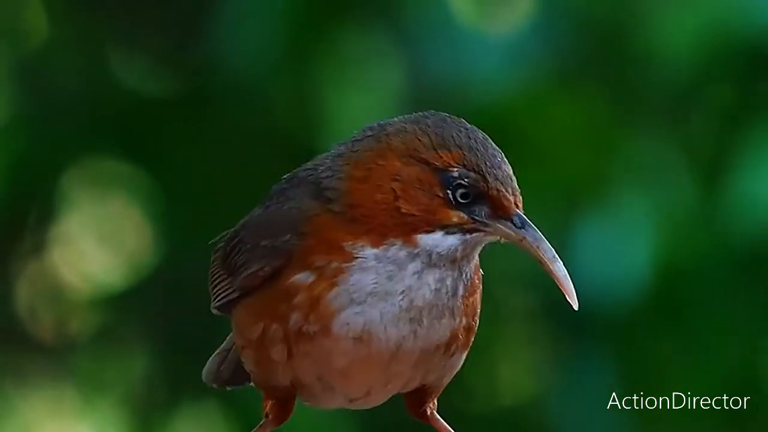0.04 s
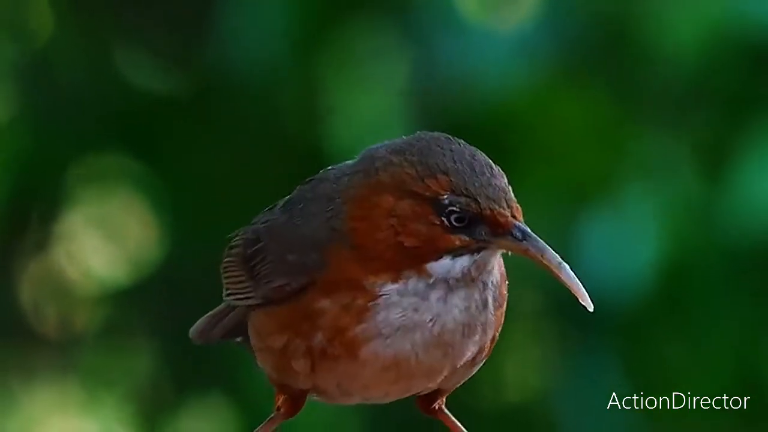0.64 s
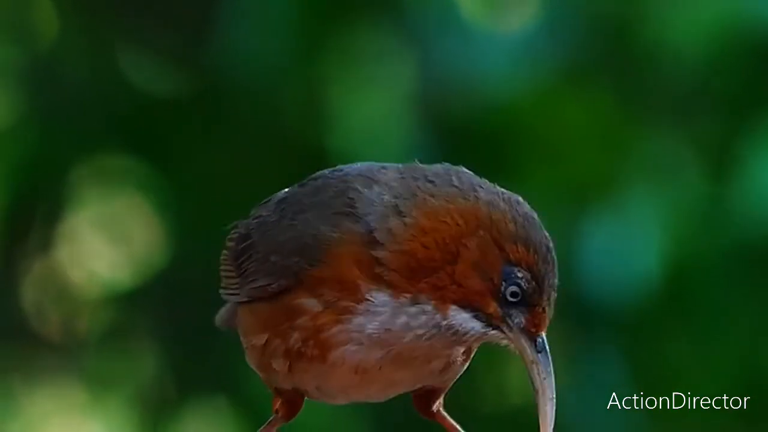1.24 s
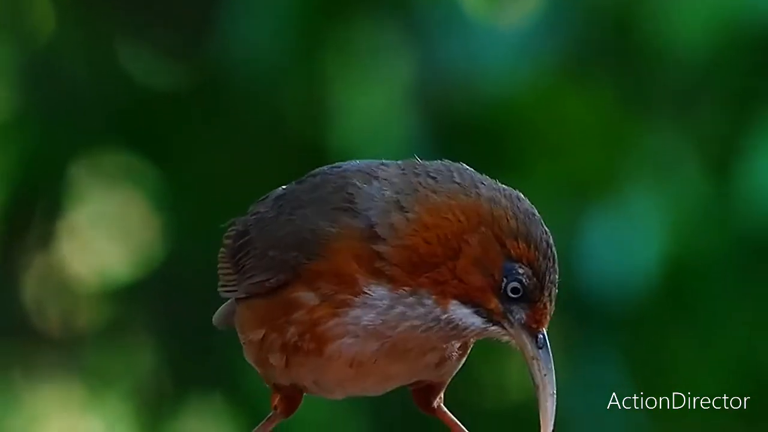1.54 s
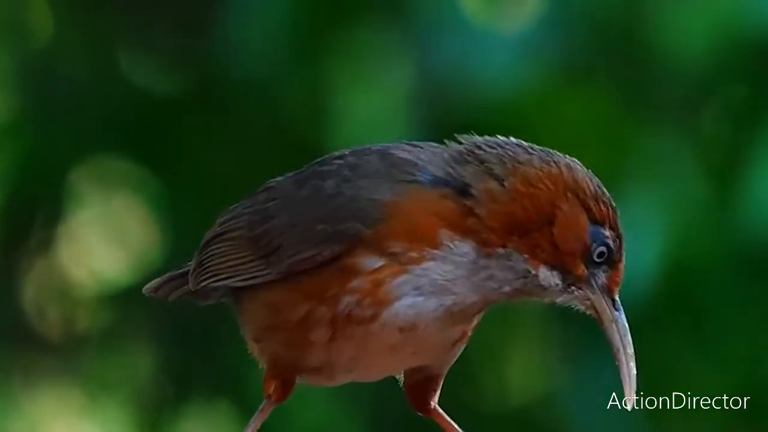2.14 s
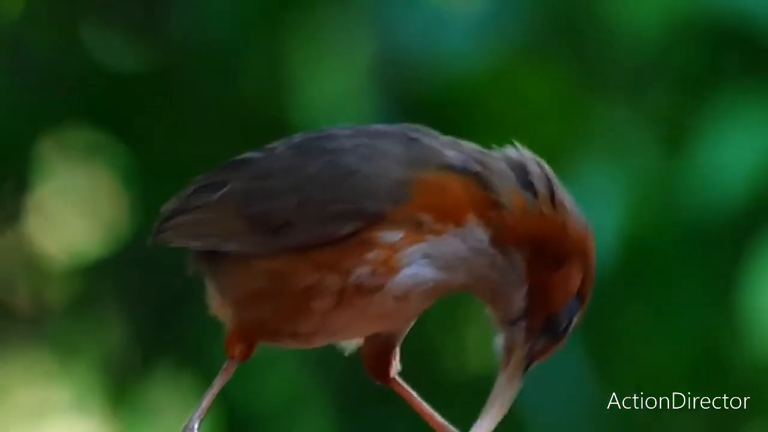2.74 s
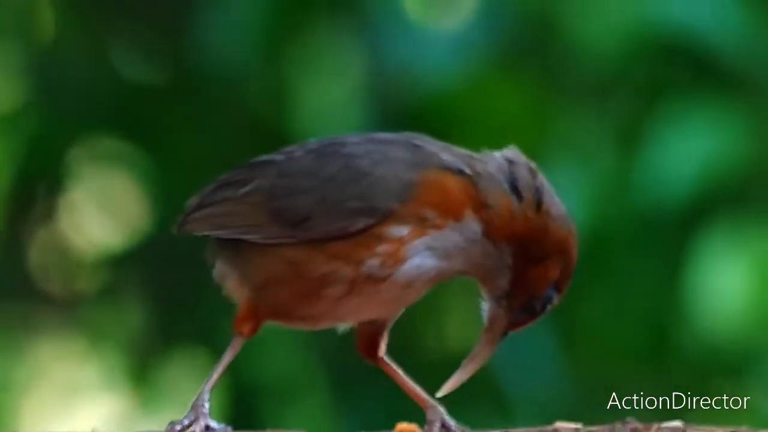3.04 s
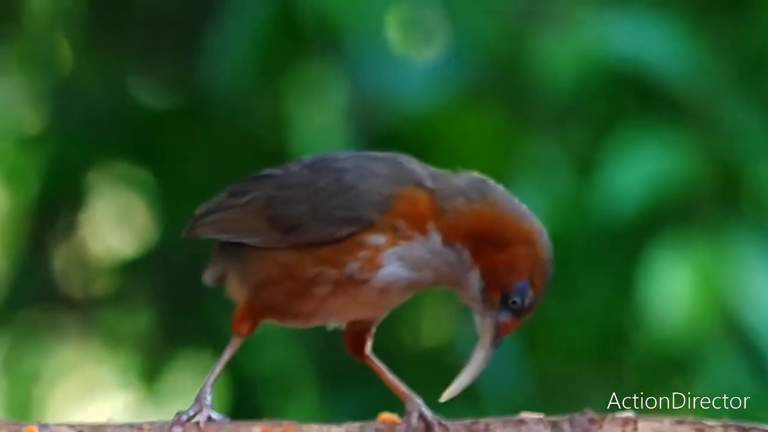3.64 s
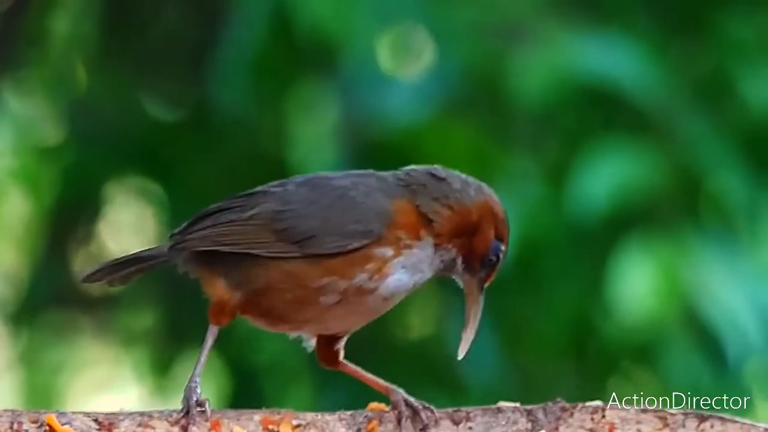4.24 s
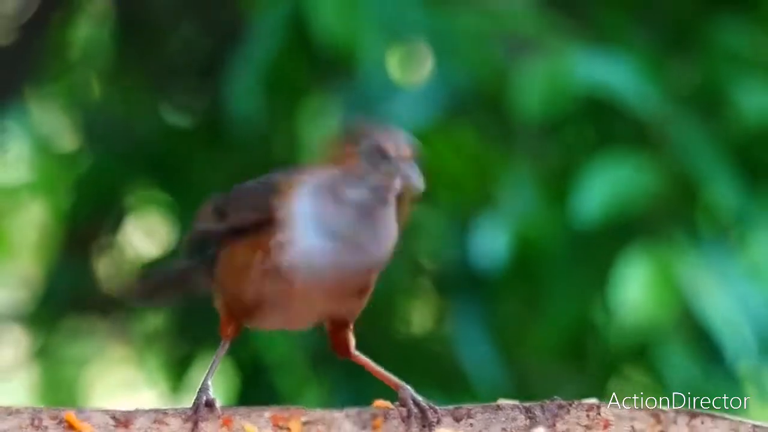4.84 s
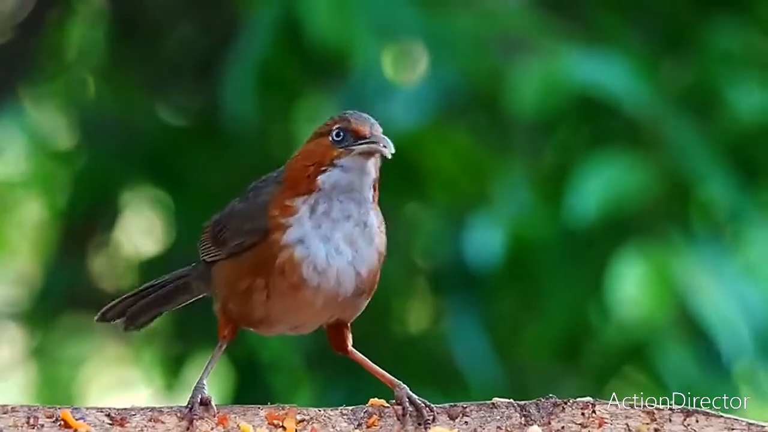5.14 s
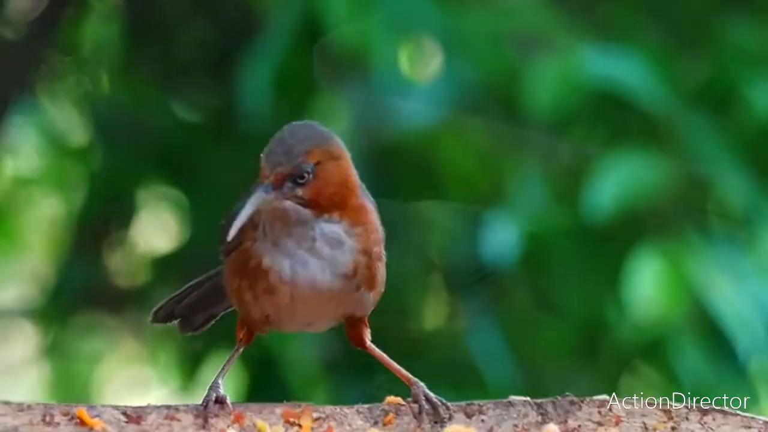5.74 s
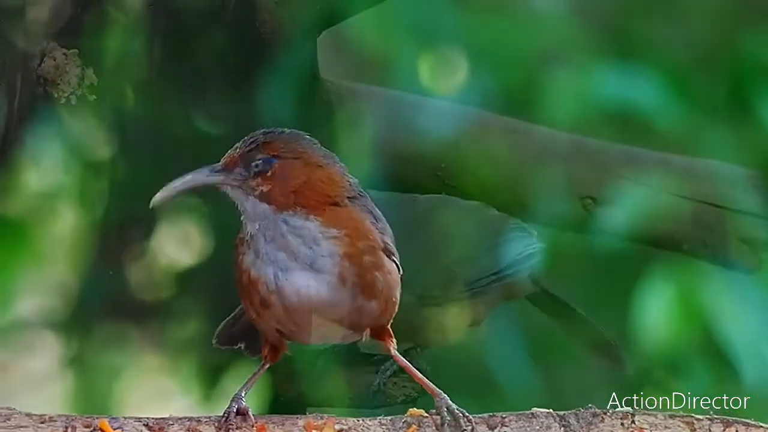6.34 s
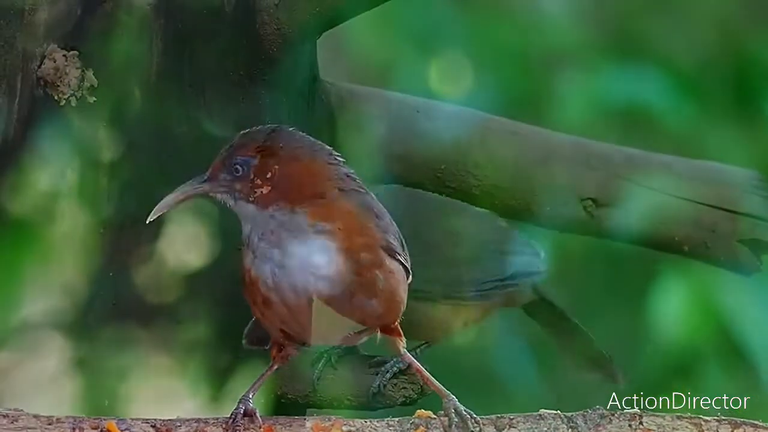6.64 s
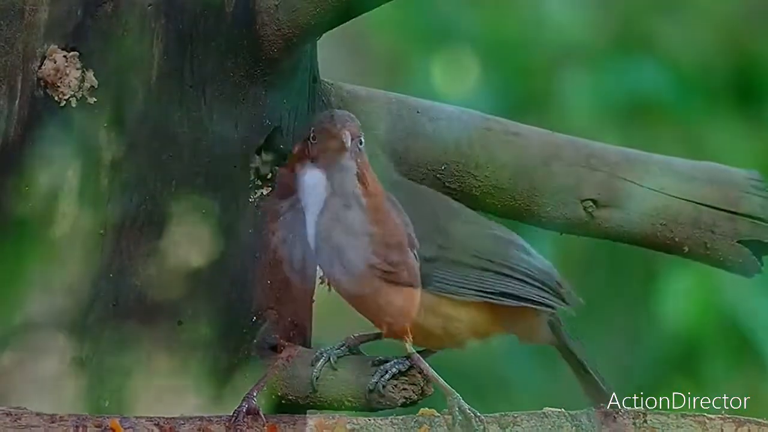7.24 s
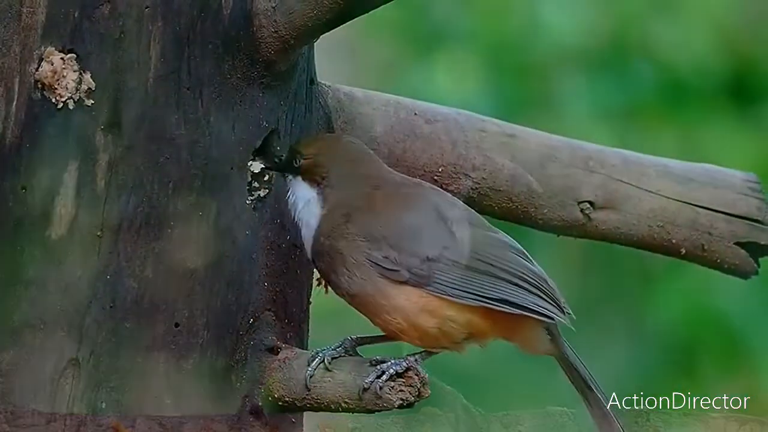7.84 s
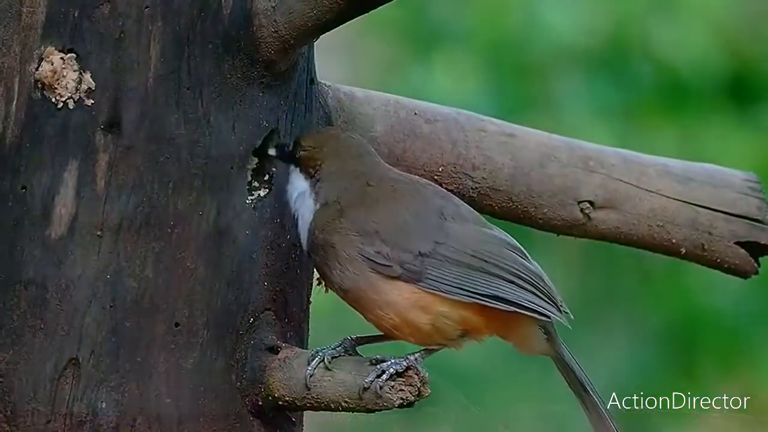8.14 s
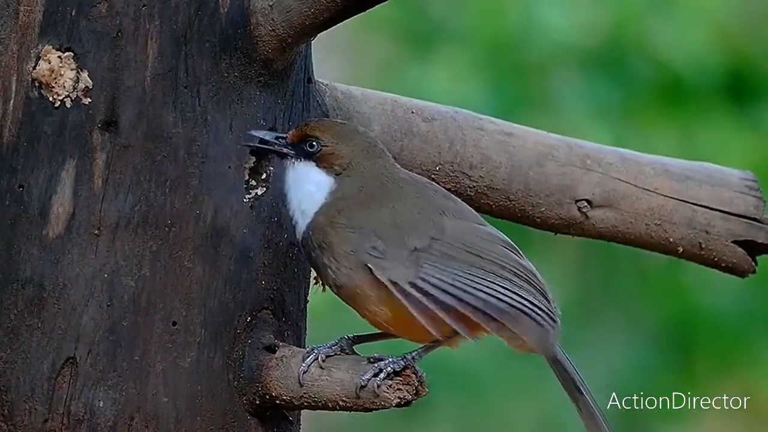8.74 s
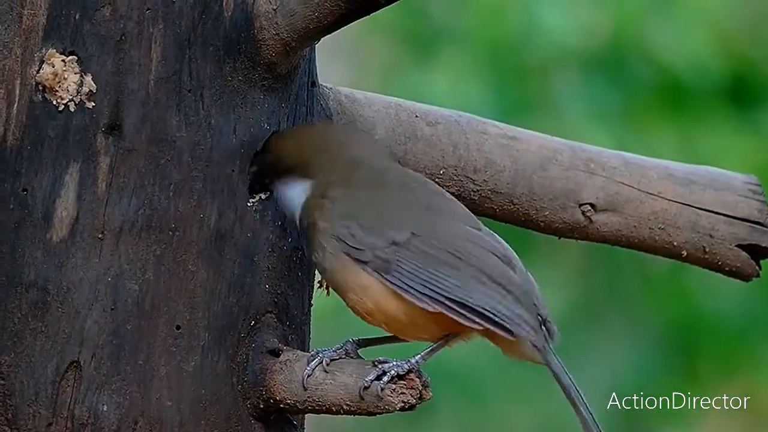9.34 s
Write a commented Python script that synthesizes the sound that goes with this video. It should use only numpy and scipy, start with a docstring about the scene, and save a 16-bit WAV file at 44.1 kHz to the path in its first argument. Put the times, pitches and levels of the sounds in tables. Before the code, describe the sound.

A faint, steady hiss runs throughout in a forest. In the first 1.3 seconds a distant bird gives four rising, whip-like calls, and a nearer songbird sings one short note at about 0.7 seconds. From 2.3 to 3.2 seconds that nearer bird sings a trill of nasal, falling notes, about twelve a second. At 5.3 seconds a second, clearly louder bird begins a slightly hoarse trill that sinks in pitch until 6.4 seconds. The first bird joins just after 6 seconds and continues to about 7. A softer, dry bird rasp comes at 7.6 seconds, with four thin whistles stepping upward until 8.7. The first bird then gives a last short trill, ending around 9.2 seconds. Very faint, faraway hoots, coos, chips and twitters come and go, and the trees give each call a short echo.

```python
"""A forest, over a faint, steady hiss. A far bird hoots and another gives four rising whips; distant chips,
twitters and coos come and go. A babbler sings one note, then a trill: about twelve nasal, falling notes
a second, made by vibrating membranes in its throat. After five seconds its louder partner, the lead,
trills too, and the first bird, its mate, joins in before it ends. A dry rasp and thin whistles follow,
then the mate's last trill. The trees give every call a short echo."""
import sys
import numpy as np
from scipy import signal
from scipy.fft import rfft, irfft, next_fast_len
from scipy.io import wavfile

SR = 44100
rng = np.random.default_rng(int(sys.argv[2]) if len(sys.argv) > 2 else 0)


def generate_wav(signal):
    """Clip the signal to [-1, 1] and save it as 16-bit WAV at the path in sys.argv[1]."""
    frames = np.transpose(np.atleast_2d(signal))
    scaled = np.clip(frames, -1, 1) * 32767
    pcm = np.round(scaled).astype(np.int16)
    wavfile.write(sys.argv[1], SR, pcm)


N = 418068

# Levels in the tables are relative: echo and mixing set the final loudness. tone colour of the steady
# background hiss: f/Hz, level/dB
HISS_COLOUR = [(15, -43), (25, -10.5), (50, 0), (190, -1), (330, -2), (700, -4.5), (1270, -8.5), (2100, -8),
               (3200, -7.5), (5100, -12), (9800, -21), (11800, -24), (12800, -34), (15400, -33)]
# tone colour of the echo among the trees: f/Hz, level/dB
ECHO_COLOUR = [(500, 6), (2700, 3), (5500, 4), (8200, 4.5), (14000, -19)]
# low, very distant hoots: t/s, length/s, first f/Hz, level/dB
HOOTS = [(0, 0.24, 690, -76), (3.266, .37, 750, -70), (4.297, .48, 690, -73.5), (5.181, .43, 700, -71),
         (6.946, 0.52, 700, -78.5)]
# lower, rising coos: t/s, length/s, level/dB
COOS = [(2.773, 0.15, -70), (3.188, 0.053, -65.5), (5.069, .12, -70), (8.203, 0.46, -75)]
# bursts of twittering deep in the leaves: t/s, length/s, centre f/Hz, level/dB
TWITTERS = [(0.186, 0.19, 3020, -72.5), (0.914, 0.08, 4550, -69), (1.664, 0.19, 3740, -75),
            (2.012, 0.31, 7270, -84.5), (2.927, 0.13, 3590, -69.5), (7.184, 0.11, 3220, -67),
            (8.12, 0.16, 4250, -71.5), (8.29, 0.089, 6950, -77.5)]
# rising whips of a bird deep in the trees: t/s at the top, top f/Hz, level/dB
WHIPS = [(0.109, 4530, -49), (0.484, 4360, -50), (.865, 4340, -50), (1.216, 4380, -48)]
# a far bird's repeated falling chip: t/s, level/dB
CHIPS = [(0.713, -65), (1.414, -65), (2.095, -62.5), (3.41, -66.5), (3.59, -67), (4.0, -66.5),
         (4.199, -68.5), (5.02, -67.5), (7.27, -65), (8.99, -63.5), (9.394, -66.5)]
# single far calls that slide up or down: t/s, length/s, first f/Hz, last f/Hz, level/dB
SLIDES = [(7.137, 0.084, 5600, 3020, -63.5), (7.334, 0.046, 2670, 2970, -62),
          (7.479, 0.034, 2730, 2500, -60), (7.542, 0.039, 2700, 3010, -61), (8.871, 0.015, 1770, 2570, -61),
          (9.286, 0.16, 1784, 2250, -67)]
# thin whistles, each a step higher: t/s, length/s, middle f/Hz, level/dB
THIN_WHISTLES = [(7.726, 0.133, 3157, -58), (8.108, 0.18, 3303, -55.5), (8.292, 0.189, 3350, -59),
                 (8.559, 0.19, 3497, -51.5)]
# pitches at which the rasping bird's throat rings: f/Hz, width/Hz, level/dB
RASP_THROAT = [(1290, 97, 0.5), (1900, 81, -3.5), (2250, 330, -4.5), (3220, 250, -3.5), (4300, 420, -5),
               (5400, 900, -13), (6900, 850, -15)]

# the lead babbler's trill: t/s, length/s, top f/Hz, level/dB
LEAD_NOTES = [(5.303, 0.058, 3015, -34), (5.391, 0.051, 3086, -31), (5.473, .058, 3035, -31),
              (5.557, 0.059, 3016, -30.5), (5.639, 0.056, 2958, -29), (5.716, 0.051, 2907, -28.5),
              (5.795, 0.048, 2860, -28), (5.873, 0.047, 2830, -28), (5.95, .043, 2798, -27.5),
              (6.024, .044, 2745, -28), (6.102, .04, 2728, -27), (6.175, .041, 2686, -26.5),
              (6.249, .04, 2636, -28), (6.32, 0.042, 2568, -30.5), (6.396, .045, 2510, -35)]
# its mate's notes, one alone and then three trills: t/s, length/s, top f/Hz, level/dB
MATE_NOTES = [(.674, 0.04, 2480, -46), (2.327, 0.064, 2763, -44), (2.418, 0.053, 2800, -41.5),
              (2.502, 0.048, 2805, -40.5), (2.579, 0.05, 2770, -40.5), (2.659, .052, 2755, -40.5),
              (2.735, 0.051, 2735, -40.5), (2.815, .047, 2702, -42), (2.899, 0.038, 2660, -36.5),
              (2.98, 0.036, 2604, -39), (3.068, 0.039, 2560, -41), (3.185, 0.039, 2516, -43),
              (6.144, .045, 2830, -42), (6.234, 0.04, 2857, -37.5), (6.315, 0.044, 2840, -37.5),
              (6.393, 0.051, 2820, -38), (6.473, .046, 2803, -38.5), (6.55, 0.046, 2772, -37),
              (6.628, 0.05, 2762, -38), (6.701, 0.054, 2746, -39), (6.781, .054, 2740, -39.5),
              (6.863, 0.051, 2685, -39), (6.951, 0.045, 2627, -38.5), (7.049, 0.041, 2554, -39.5),
              (8.737, 0.063, 2672, -41), (8.845, 0.057, 2704, -42), (8.937, 0.046, 2715, -41),
              (9.019, 0.04, 2672, -38), (9.104, 0.037, 2575, -40), (9.203, 0.039, 2514, -44.5)]
# harmonics 2 to 6 (multiples of the base pitch): full-voice level/dB, relaxed-voice level/dB
LEAD_OVERTONES = [(-14.5, -23.5), (-16, -31), (-35.5, -41), (-47, -59), (-50, -63)]
MATE_OVERTONES = [(-2, -14.5), (-10.5, -26.5), (-26, -57), (-53, -37), (-56, -39)]
# how the base tone (row 1) and overtones (row 2) swell: start level/dB, peak/share of note, end level/dB
LEAD_SWELL = [(-10.5, 0.54, -12.5), (-17, 0.41, -21.5)]
MATE_SWELL = [(-5, 0.8, -3), (-15.5, 0.38, -19.5)]
# higher notes sag further: top f/Hz, sag/share of pitch
LEAD_SAG = [(2560, 0.038), (2880, 0.121)]
MATE_SAG = [(2660, .035), (2850, 0.0835)]
# when the voices turn hoarse: start t/s, end t/s, cycles per flutter, flutter depth/0-1, grit/0-1
HOARSE_SPELLS = [(2.348, 2.393, 3, 0.26, 0), (2.44, 2.474, 3, 0.28, 0.03), (2.59, 2.95, 2, 0.05, 0),
                 (5.39, 5.93, 2, 0.06, 0.08), (5.93, 6.37, 2, 0.08, 0.07), (6.57, 6.92, 2, 0.09, 0.09)]
# the top two harmonics beam forward, so they come and go as the heads turn: t/s, level/dB
HEAD_TURNS = [(.7, 9), (3, -7), (5.7, 3), (7, -7), (9, 11)]


def from_db(db):
    """Turn decibels into a number to multiply a sound by."""
    return 10 ** (np.asarray(db) / 20)


def add(track, s, sound):
    """Mix a sound into the track, starting at s seconds."""
    at = max(round(s * SR), 0)
    track[at:at + len(sound)] += sound[:max(N - at, 0)]


def waver(size, per_s):
    """A random wobble that heads for a new value per_s times a second."""
    steps = np.arange(size) * per_s / SR
    return np.interp(steps, np.arange(400), rng.standard_normal(400))


def fade(t, edge_s):
    """Soften both ends of a sound."""
    from_edge_s = np.minimum(t - t[0], t[-1] - t)
    return np.sin(np.pi / 2 * np.clip(from_edge_s / edge_s, 0, 1)) ** 2


def coloured(x, spectrum):
    """Turn each frequency up or down along a curve of (Hz, dB) points."""
    hz, db = np.transpose(spectrum)
    size = next_fast_len(len(x))
    bin_hz = np.maximum(np.arange(size // 2 + 1) * SR / size, 1)
    gain = from_db(np.interp(np.log(bin_hz), np.log(hz), db))
    return irfft(rfft(x, size) * gain, size)[:len(x)]


def tone(hz, db):
    """A pure tone that follows a changing pitch."""
    return np.sqrt(2) * from_db(db) * np.sin(2 * np.pi * np.cumsum(hz) / SR)


def whistles(calls, edge_s, jitter):
    """Slightly wobbly tones that each bend through three pitches."""
    out = np.zeros(N)
    for s, length, first_hz, middle_hz, last_hz, db in calls:
        t = np.arange(int(length * SR)) / SR
        bend = np.polyfit([0, .5, 1], [first_hz, middle_hz, last_hz], 2)
        hz = np.polyval(bend, t / length) * (1 + jitter * waver(len(t), 149.3))
        add(out, s, tone(hz, db) * fade(t, min(edge_s, length / 2)))
    return out


def background_hiss(db=-65.5):
    """Faint, steady noise, strongest in the low range."""
    noise = coloured(rng.standard_normal(N), HISS_COLOUR)
    return from_db(db) * noise / np.sqrt(np.mean(noise ** 2))


def tree_echo(x, trunk_db, trunk_s, leaf_db, leaf_s):
    """Trunks add a quick echo and leaves a longer one; they fade by 60 dB in trunk_s and leaf_s."""
    t = np.arange(int(1.2 * SR)) / SR
    bounces = rng.standard_normal(len(t)) * (rng.random(len(t)) < 1500 / SR)
    trunks = bounces * from_db(-60 * t / trunk_s) * (t > .005)
    leaves = rng.standard_normal(len(t)) * from_db(-60 * t / leaf_s) * np.clip(t / 0.026, 0, 1)
    echo = from_db(trunk_db) * trunks / np.linalg.norm(trunks)
    echo += from_db(leaf_db) * leaves / np.linalg.norm(leaves)
    return x + signal.fftconvolve(x, coloured(echo, ECHO_COLOUR))[:N]


def hoots_and_coos():
    """Low, soft tones: the hoots all sink to one closing pitch, and the coos rise."""
    hoots = [(s, length, hz, 712, 630, db) for s, length, hz, db in HOOTS]
    coos = [(s, length, 540, 596, 621, db) for s, length, db in COOS]
    return whistles(hoots + coos, edge_s=0.013, jitter=0.022)


def twitters(per_s=70, spread=.1, sweep=0.133, slide_s=.03, chatter_db=-76):
    """Each burst is a jumble of quick pitch slides; short, faint bursts also come at random."""
    chatter = [(s, .06, hz, chatter_db) for s, hz in rng.uniform([0, 2500], [N / SR, 4600], (45, 2))]
    calls = []
    for s, length, hz, db in TWITTERS + chatter:
        for at in np.arange(s, s + length, 1 / per_s):
            offset, slope, loudness = np.clip(rng.standard_normal(3), -2, 2)
            middle, glide = hz * np.exp(spread * offset), np.exp(sweep * slope)
            calls.append((at, slide_s, middle * glide, middle, middle / glide, db + 2 * loudness))
    return whistles(calls, edge_s=0.01, jitter=0.0214)


def whips(climb_s=.08, flick_s=0.012, hold_s=0.0084, swell_db_per_s=230, throat_hz=3450):
    """A soft, slow climb curves into a fast upward flick, boosted where the throat rings."""
    out = np.zeros(N)
    t = np.arange(-climb_s, hold_s, 1 / SR)
    rising = np.minimum(t, 0)   # the pitch reaches its top at t = 0
    share_of_top = .66 + 2.1 * rising + .34 * np.exp(rising / flick_s)
    for s, top_hz, db in WHIPS:
        hz = top_hz * share_of_top
        throat_db = 7.5 * np.exp(-((hz - throat_hz) / 450) ** 2)
        add(out, s + t[0], tone(hz, db + swell_db_per_s * rising + throat_db) * fade(t, .005))
    return out


def far_calls():
    """Small birds further off whistle short chips, slides and thin, nearly level notes."""
    chips = [(s, 0.071, 3350, 3125, 3010, db) for s, db in CHIPS]
    slides = [(s, length, first, np.sqrt(first * last), last, db) for s, length, first, last, db in SLIDES]
    thin = [(s, length, hz * 1.022, hz, hz * 0.96, db) for s, length, hz, db in THIN_WHISTLES]
    short_calls = whistles(chips + slides, edge_s=0.013, jitter=0.0072)
    return short_calls + whistles(thin, edge_s=0.033, jitter=0.0068)


def rasp(start_s=7.625, length_s=0.491, db=-52.5, fall_db_per_s=21.5, puffs_per_s=88, puff_s=0.0028):
    """Uneven puffs of noise make a bird's throat ring. The rasp starts quickly, dies down and stops."""
    timing, strength = rng.standard_normal((60, 2)).T
    times = start_s + np.cumsum(np.clip(1 + 0.23 * timing, .3, 2)) / puffs_per_s
    pulses = np.zeros(N)
    pulses[(times * SR).astype(int)] = from_db(4.0 * strength)
    puffs = signal.lfilter([1], [1, -np.exp(-1 / (puff_s * SR))], pulses + 1e-18)
    breath = (0.41 + puffs) * rng.standard_normal(N)   # some air leaks between the puffs
    out = np.zeros(N)
    for k, (hz, width_hz, ring_db) in enumerate(RASP_THROAT):
        ring = signal.lfilter(*signal.iirpeak(hz, hz / width_hz, fs=SR), breath)
        out += (-1) ** k * from_db(ring_db) * ring
    out = signal.sosfilt(signal.butter(2, 9000, fs=SR, output="sos"), out)
    t = np.clip(np.arange(N) / SR - start_s, 0, length_s)
    gate = fade(t, edge_s=0.043)
    return out / np.std(out[gate > 0]) * from_db(db - fall_db_per_s * t) * gate


def swell(u, start_db, peak_at, end_db):
    """A rounded rise and fall in dB as u runs from 0 to 1 through a note."""
    rise = start_db * (1 - u / peak_at) ** 2
    fall = end_db * ((u - peak_at) / (1 - peak_at)) ** 2
    return np.where(u < peak_at, rise, fall)


def progress(notes, pause_s=.5):
    """How far through its trill each note comes, from 0 to 1. A gap over pause_s ends a trill."""
    starts = np.array(notes)[:, 0]
    trills = np.split(starts, np.flatnonzero(np.diff(starts) > pause_s) + 1)
    return np.concatenate([np.linspace(0, 1, len(trill)) for trill in trills])


def hoarseness(scene_t, phase):
    """The membranes beat unevenly, every second or third cycle and at random, so the voice flutters."""
    size = len(scene_t)
    flutter = np.zeros(size)
    for start, end, cycles, depth, grit in HOARSE_SPELLS:
        gate = np.clip(np.minimum(scene_t - start, end - scene_t) / 0.004, 0, 1)
        beat = np.cos(phase / cycles + 4 * grit * waver(size, 900))
        roughness = waver(size, 3000) + waver(size, 700)
        flutter += 2 * gate * (depth * beat + grit * roughness)
    return flutter


def babbler_note(row, sag, drop, relaxed, harmonics, swells, jitter, rise_s):
    """One nasal note: it scoops up for rise_s, sags, then drops as the air runs out."""
    s, length, top_hz, db = row
    t = np.arange(int(length * SR)) / SR
    u = t / t[-1]
    scoop = 1 - 0.216 * np.clip(1 - (t / max(rise_s, 1e-6)) ** 2, 0, 1)
    sagging = 1 - sag * u ** 1.7
    slide = scoop * (sagging - drop * u ** 12)
    # at the top of a long scoop the voice cracks: the pitch briefly overshoots
    crack = 0.77 * rise_s * np.exp(-((t - rise_s) / .002) ** 2)
    hz = top_hz * slide * (1 + crack + jitter * waver(len(t), 881.0))
    phase = 2 * np.pi * np.cumsum(hz) / SR
    base_db, overtone_db = (swell(u, *shape) for shape in swells)
    # slack membranes weaken the base tone and the top harmonics, while the second harmonic grows
    slack_db = 39 * (1 - slide / sagging)
    base = from_db(db + base_db - slack_db / 2) * np.sin(phase)
    levels = np.array([db + full_db + relaxed * (soft_db - full_db) for full_db, soft_db in harmonics])
    levels[-2:] += np.interp(s, *np.transpose(HEAD_TURNS))
    overtones = sum(from_db(level + overtone_db - (k - 3) * slack_db) * np.sin(k * phase)
                    for k, level in enumerate(levels, 2))
    flutter = hoarseness(s + t, phase)
    # the throat lets out only the high part of the base tone's flutter
    throat = signal.butter(4, 3300, "high", fs=SR, output="sos")
    harshness = signal.sosfilt(throat, .3 * base * flutter)
    return np.sqrt(2) * (base + harshness + overtones * (1 + flutter)) * fade(t, edge_s=0.0035)


def mate_babbler(end_drop=0.097, middle_drop=0.19, full_hz=2878, relaxed_hz=2540):
    """The quieter bird. Its notes drop furthest mid-trill, and its voice relaxes on lower notes."""
    out = np.zeros(N)
    for row, along in zip(MATE_NOTES, progress(MATE_NOTES)):
        s, _, hz, _ = row
        sag = np.interp(hz, *np.transpose(MATE_SAG))
        drop = end_drop + (middle_drop - end_drop) * np.sin(np.pi * along)
        relaxed = np.clip((full_hz - hz) / (full_hz - relaxed_hz), 0, 1) ** 2
        note = babbler_note(row, sag, drop, relaxed, MATE_OVERTONES, MATE_SWELL, jitter=0.0063, rise_s=0)
        add(out, s, note)
    return out


def lead_babbler(full_drop=0.27, slow_rise_s=0.031, quick_rise_s=0.00427, jitter=0.0095):
    """The louder bird, brightest mid-trill. As it gets going its scoops quicken and its drops deepen."""
    out = np.zeros(N)
    for row, along in zip(LEAD_NOTES, progress(LEAD_NOTES)):
        s, _, hz, _ = row
        sag = np.interp(hz, *np.transpose(LEAD_SAG))
        drop = full_drop * (1 - np.exp(-along / 0.17))
        relaxed = 1 - np.sin(np.pi * along)
        rise_s = quick_rise_s + (slow_rise_s - quick_rise_s) * np.exp(-along / 0.148)
        rise_s *= along > 0   # the opening note starts on pitch
        add(out, s, babbler_note(row, sag, drop, relaxed, LEAD_OVERTONES, LEAD_SWELL, jitter, rise_s))
    return out


def scene():
    """Mix the birds over the hiss. The further off a bird is, the more of it arrives as echo."""
    duet = lead_babbler() + mate_babbler()
    near = tree_echo(duet, trunk_db=-12.5, trunk_s=0.054, leaf_db=-13, leaf_s=0.68)
    calling = tree_echo(far_calls(), trunk_db=-6, trunk_s=0.18, leaf_db=-7, leaf_s=1.0)
    twittering = tree_echo(twitters(), trunk_db=-0.5, trunk_s=0.091, leaf_db=-7.5, leaf_s=0.53)
    whipping = tree_echo(whips(), trunk_db=-8, trunk_s=0.14, leaf_db=-7, leaf_s=0.71)
    hooting = tree_echo(hoots_and_coos(), trunk_db=-1.5, trunk_s=0.39, leaf_db=-8, leaf_s=1.0)
    rasping = tree_echo(rasp(), trunk_db=-16, trunk_s=0.097, leaf_db=-14, leaf_s=1.0)
    far = from_db(-0.5) * (calling + twittering) + from_db(-4.5) * whipping + from_db(-5) * hooting
    return (background_hiss() + far + rasping + near)[None]


def record(dry):
    """Cut away the highest treble, above 15500 Hz."""
    return signal.sosfilt(signal.ellip(10, .1, 80, 15500, fs=SR, output="sos"), dry)


dry = scene()
out = record(dry)
generate_wav(out)
```